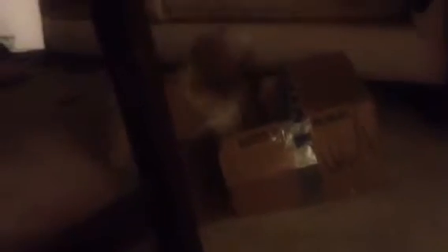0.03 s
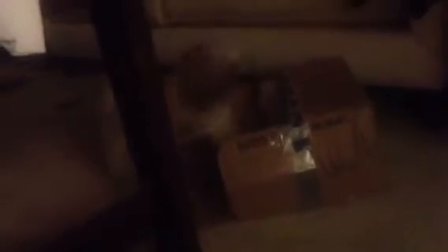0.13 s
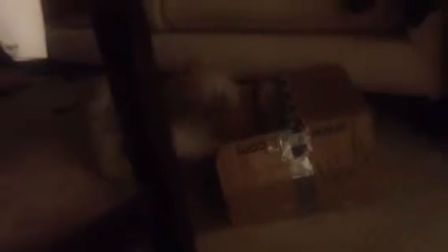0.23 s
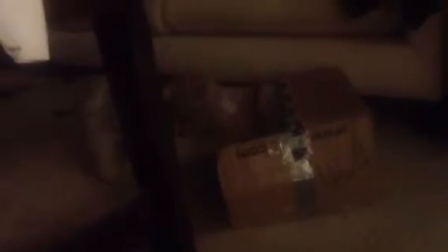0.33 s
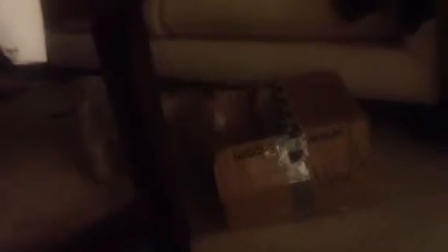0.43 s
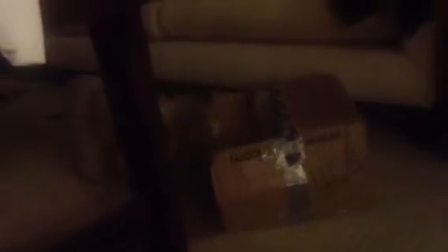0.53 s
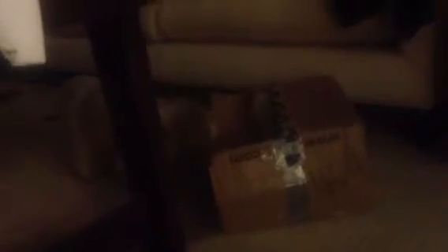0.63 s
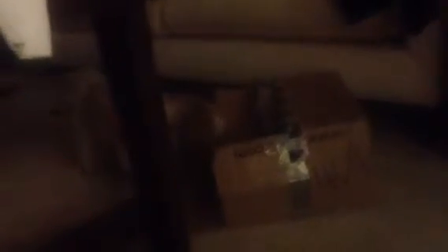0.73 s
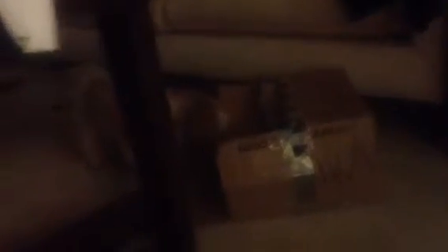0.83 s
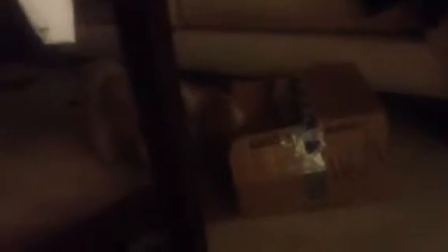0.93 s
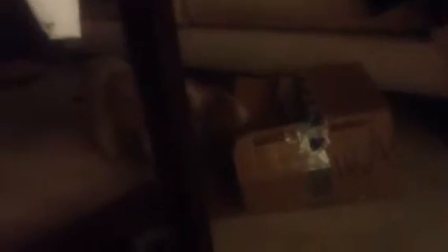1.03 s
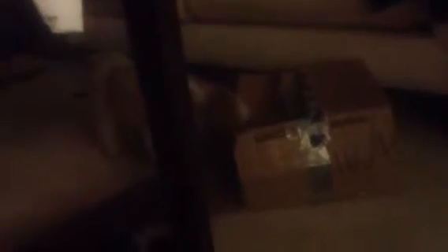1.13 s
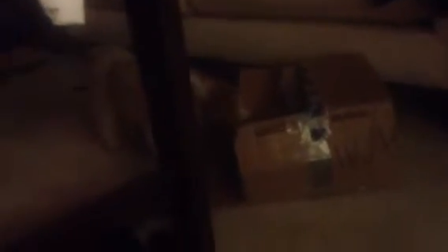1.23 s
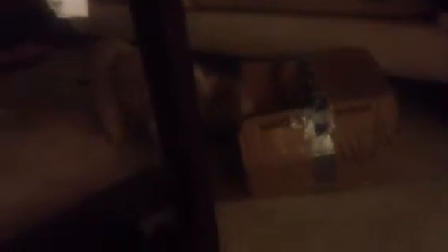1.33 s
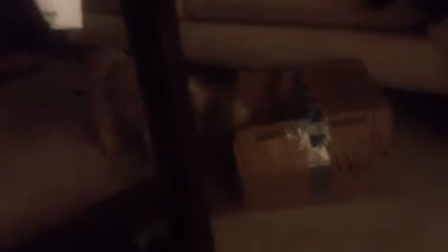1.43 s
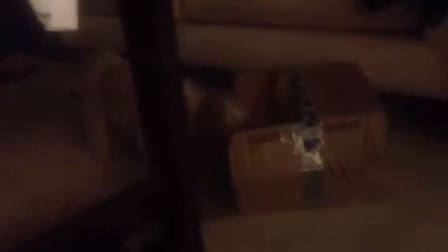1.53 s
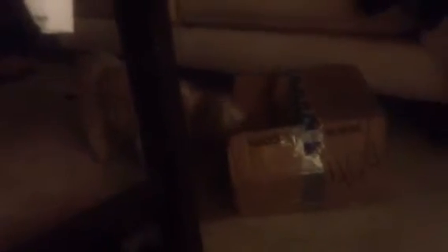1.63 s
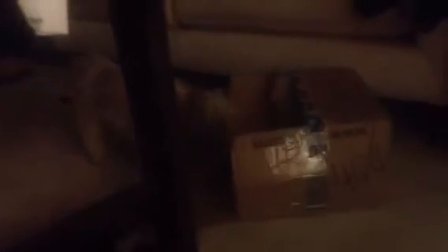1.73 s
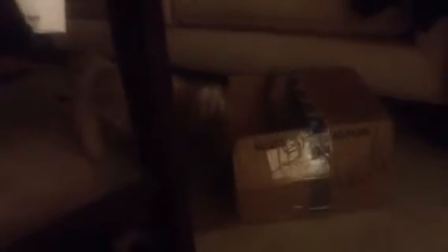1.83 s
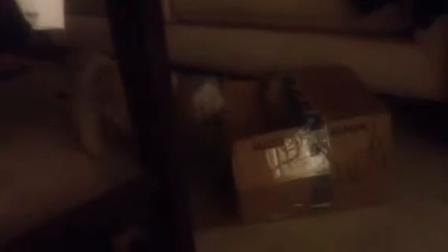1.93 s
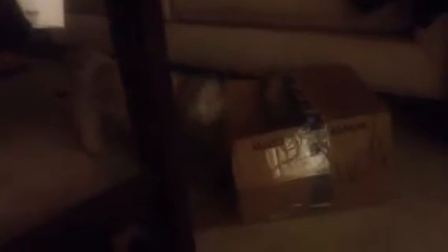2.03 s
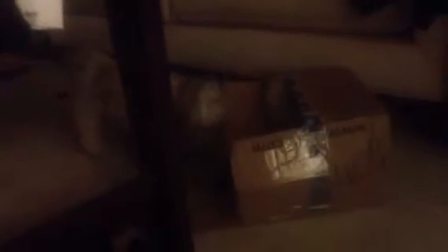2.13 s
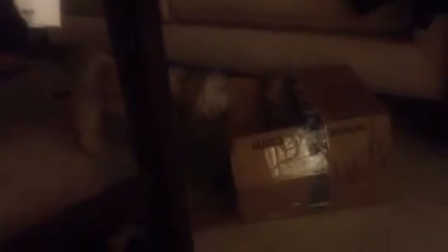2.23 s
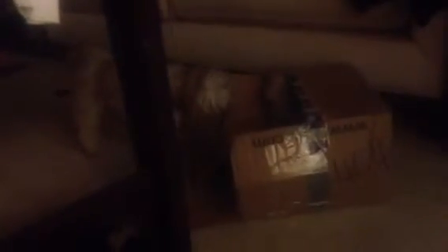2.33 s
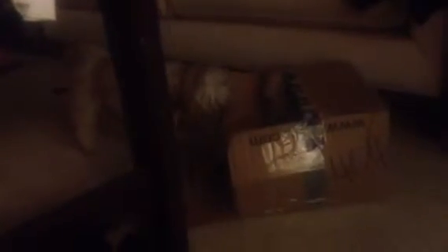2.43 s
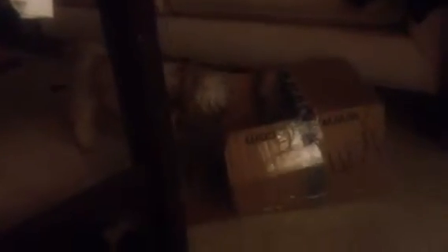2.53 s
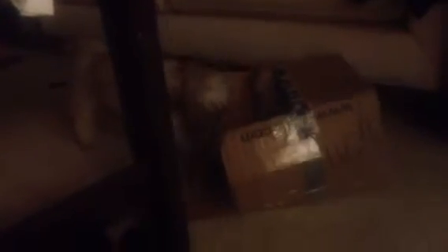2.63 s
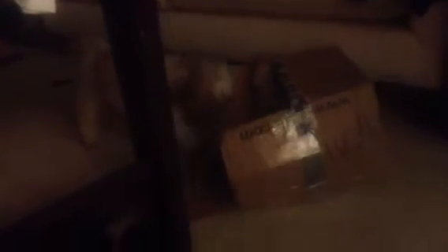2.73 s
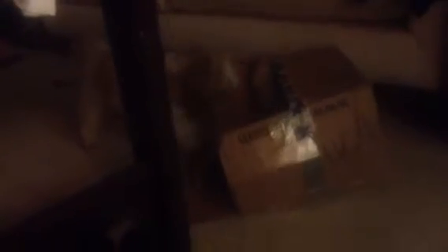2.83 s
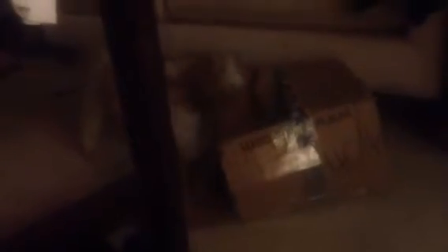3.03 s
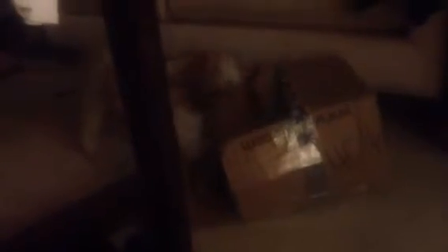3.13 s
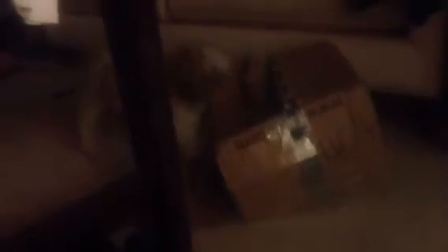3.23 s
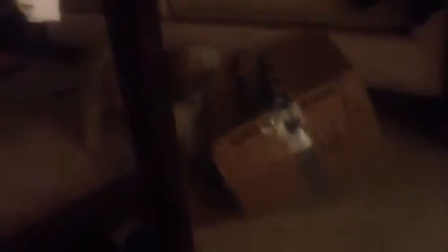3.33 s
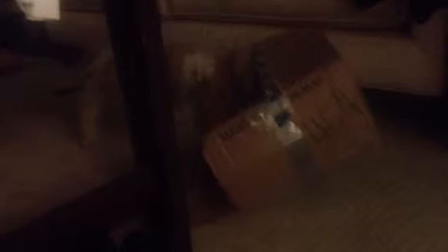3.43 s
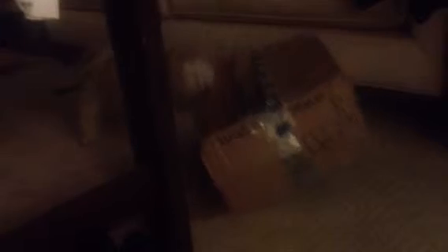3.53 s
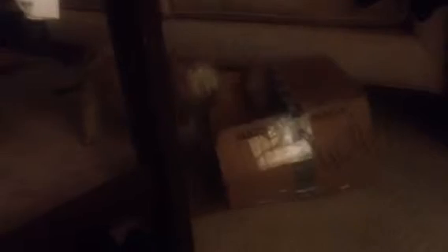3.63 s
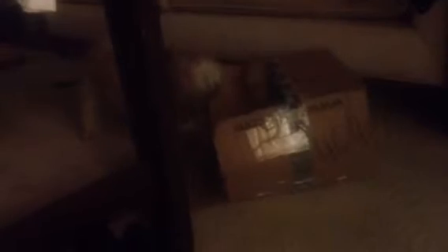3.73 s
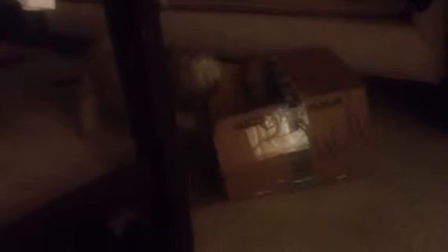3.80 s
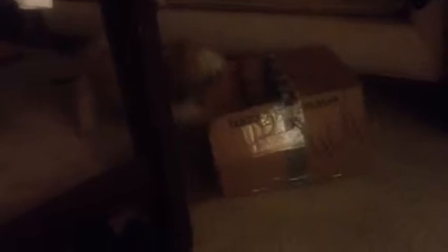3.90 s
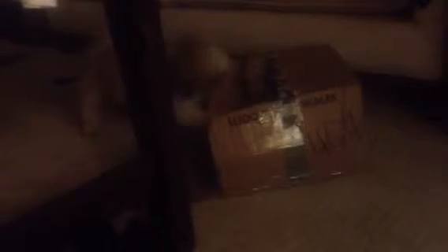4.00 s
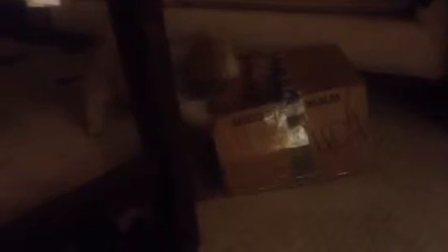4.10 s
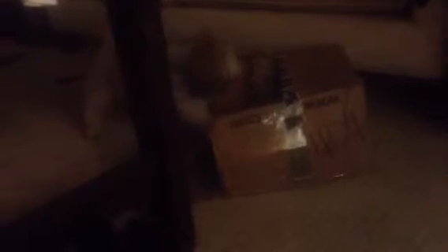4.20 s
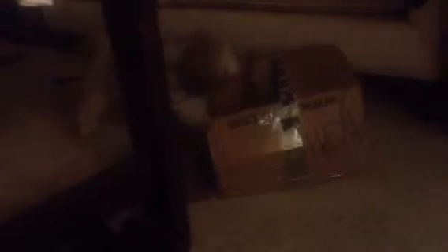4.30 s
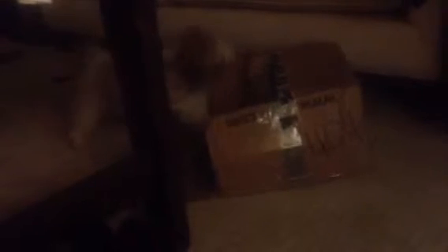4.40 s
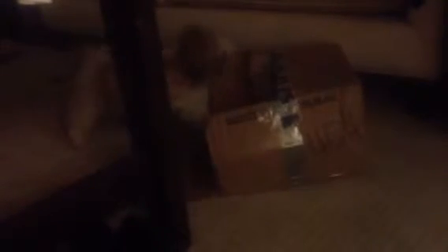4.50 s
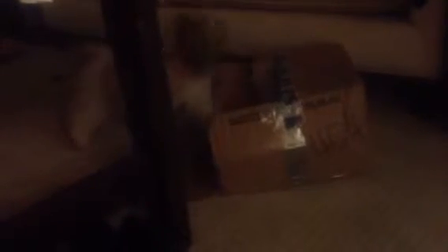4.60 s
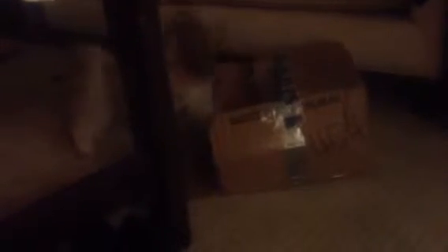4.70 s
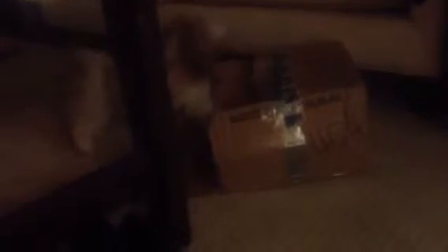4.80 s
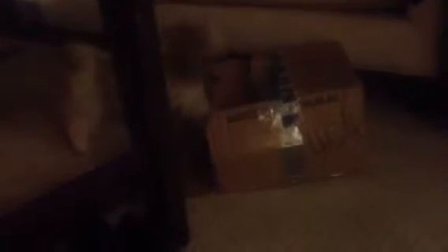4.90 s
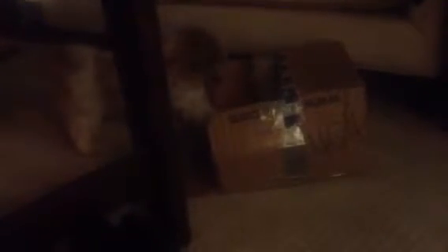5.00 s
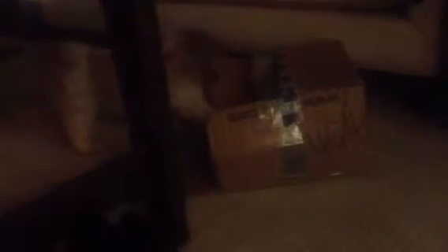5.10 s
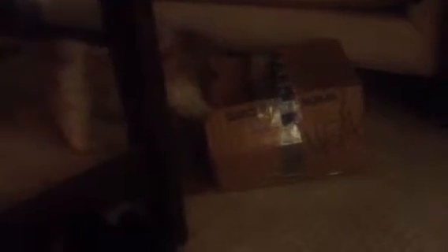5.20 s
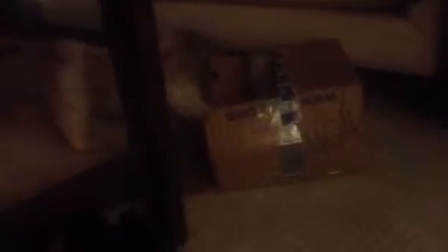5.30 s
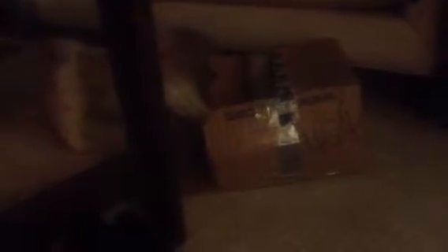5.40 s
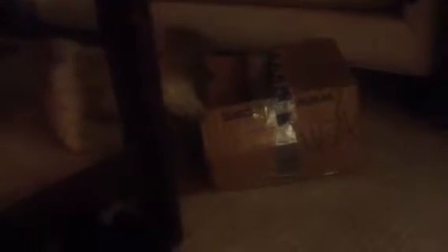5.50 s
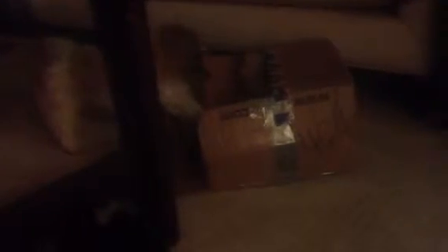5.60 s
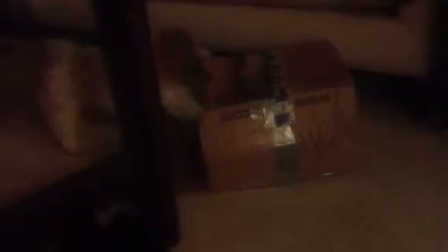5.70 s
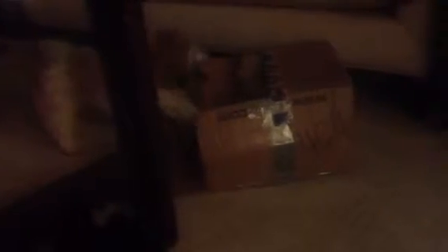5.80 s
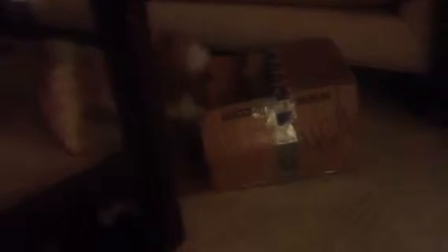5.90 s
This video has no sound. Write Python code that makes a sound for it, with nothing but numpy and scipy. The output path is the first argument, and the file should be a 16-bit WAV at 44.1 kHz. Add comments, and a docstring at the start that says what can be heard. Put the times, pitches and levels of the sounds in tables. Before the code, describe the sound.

A dog rummages in a cardboard box in a quiet room, with irregular scraping, paper rustles, crackles and hollow thumps.

```python
"""A dog rummages with its head in a taped cardboard box on a carpet, in a quiet furnished room.
Fur, paws and paper rub along the board, catching and slipping, so it rasps, hisses and drums.
Creases and tape snap. The box is knocked, tipped and dropped back: walls thump and flaps clap.
The dog sniffs faintly twice at the end. A small mono camera listens from a few steps away."""
import sys
import numpy as np
from scipy import signal
from scipy.fft import rfft, irfft, next_fast_len
from scipy.io import wavfile

SR = 44100
rng = np.random.default_rng(int(sys.argv[2]) if len(sys.argv) > 2 else 0)


def output_pcm(signal):
    """Save a mono or channel-first signal as 16-bit PCM at the path in sys.argv[1].

    Samples are clipped to [-1, 1] before scaling.
    """
    pcm = np.clip(np.atleast_2d(signal).T, -1, 1) * 32767
    wavfile.write(sys.argv[1], SR, np.round(pcm).astype(np.int16))


N = 262395


def amp(db):
    """Turn decibels into a number to multiply by."""
    return 10 ** (np.asarray(db) / 20)


def unit(x, seconds=None):
    """Scale x to an average strength (rms) of 1, over all of it or its first seconds."""
    head = x if seconds is None else x[:round(seconds * SR)]
    return x / np.sqrt(np.mean(head ** 2) + 1e-20)


def along(points, hz):
    """Read between (frequency, value) points, with octaves evenly spaced."""
    freqs, values = np.transpose(points)
    return np.interp(np.log(hz + 1), np.log(freqs), values)


def colour(x, points):
    """Shape the tone of x to follow the (f/Hz, level/dB) points."""
    size = 2 * next_fast_len(len(x) // 2 + 1024)
    gain = amp(along(points, np.fft.rfftfreq(size, 1 / SR)))
    cepstrum = irfft(np.log(gain))
    cepstrum[1:size // 2] *= 2  # folded so the filter rings after a sound, never before
    cepstrum[size // 2 + 1:] = 0
    return irfft(rfft(x, size) * np.exp(rfft(cepstrum)))[:len(x)]


def resonate(x, peaks):
    """Add ringing to x at each (f/Hz, width/Hz, level/dB) peak."""
    return x + sum(amp(db) * signal.lfilter(*signal.iirpeak(hz, hz / width, SR), x)
                   for hz, width, db in peaks)


def wobble(rate):
    """A curve that heads for a new random value rate times a second."""
    knots = rng.standard_normal(int(N * rate / SR) + 2)
    return np.interp(np.arange(N) * rate / SR, np.arange(len(knots)), knots)


def fade(t, t60):
    """Die away, dropping 60 dB in the fade time t60."""
    return np.exp(-np.log(1000) * t / t60)


def add(track, s, sound):
    """Mix a sound into the track at s seconds."""
    part = track[round(s * SR):][:len(sound)]
    part += sound[:len(part)]


# tone of the background: f/Hz, level/dB
AIR_TONE = [(25, -45), (60, -24.5), (100, -26), (130, -3.5), (165, -12), (215, 5.5), (300, -15.5),
            (400, -8), (520, -14), (1450, -15), (2400, -21.5), (7000, -23.5), (10000, -28.5),
            (15000, -23.5)]
def air():
    """The still room murmurs and the microphone hisses."""
    return amp(-67.0) * unit(colour(rng.standard_normal(N), AIR_TONE))


# how long the room's echo lasts: f/Hz, fade time/s
ECHO_TIMES = [(150, 0.098), (800, 0.32), (4500, 0.24), (12000, 0.21)]
def room(x, wet_db):
    """The direct sound plus a short wash of echo at wet_db, new for each place it comes from."""
    hz, t, spectrum = signal.stft(rng.standard_normal(SR // 5), SR, nperseg=256)
    tail = signal.istft(spectrum * fade(t, along(ECHO_TIMES, hz)[:, None]), SR, nperseg=256)[1]
    tail *= 1 - fade(np.arange(len(tail)) / SR, 0.017)  # the first walls answer after a few ms
    response = amp(wet_db) * tail / np.linalg.norm(tail)
    response[0] = 1
    return signal.fftconvolve(x, response / np.linalg.norm(response))[:len(x)]


def moving_room(x, wet_db, count=24):
    """The dog shifts about, so each echo blends into a new one."""
    place = np.arange(N) / N * (count - 1)
    track = np.zeros(N)
    for k in range(count):
        start = max(0, (k - 1) * N // (count - 1))
        share = np.clip(1 - abs(place - k), 0, 1)
        piece = (x * np.sqrt(share))[start:start + 3 * N // (count - 1)]
        add(track, start / SR, room(piece, wet_db))
    return track


def grainy_noise(rate, spread_db, smooth_db):
    """Tiny uneven clicks, about rate a second, over smooth noise."""
    sizes = amp(spread_db * rng.uniform(0, 1.85, N)) * rng.choice([-1, 1], N)
    clicks = unit(sizes * (rng.random(N) < rate / SR))
    return unit(clicks + amp(smooth_db) * rng.standard_normal(N))


def push(start, length, swell, sag_db_per_s=28, release_s=0.097):
    """The force of one stroke or sniff: it swells, eases while held, and is let go."""
    t = np.maximum(np.arange(N) / SR - start, 0)
    sag = amp(-sag_db_per_s * np.maximum(t - swell, 0))
    release = fade(np.maximum(t - length, 0), release_s)
    return np.minimum(t / swell, 1) * sag * release


# two short breaths: t/s, length/s, swell/s, level/dB
SNIFFS = [(5.542, 0.13, 0.014, -66.5), (5.801, 0.17, 0.02, -64.5)]
# tone of a sniff: f/Hz, level/dB
SNIFF_TONE = [(400, -30), (1300, -2), (2800, -2), (4000, -11), (9000, -30)]
# where a sniff rings: f/Hz, width/Hz, level/dB
SNIFF_PEAKS = [(1420, 450, 11), (2730, 200, 10)]
def sniffs():
    """Air rushes through the dog's nose as it sniffs faintly twice at the end."""
    force = sum(amp(db) * push(start, length, swell) for start, length, swell, db in SNIFFS)
    airflow = grainy_noise(rate=1600, spread_db=-1, smooth_db=4)
    breath = unit(resonate(colour(airflow, SNIFF_TONE), SNIFF_PEAKS))
    return room(force * amp(0.79 * wobble(40)) * breath, wet_db=-4)


# creases and tape giving way: t/s, crack level/dB, crack f/Hz, crackle level/dB
CREASE_SNAPS = [(0.206, -57, 4400, -58), (0.2508, -31, 3130, -39), (0.268, -33, 3670, -49),
                (1.6966, -64, 1970, -71), (1.7301, -54, 2080, -63), (1.766, -47.5, 3300, -66),
                (1.947, -67, 2850, -53), (2.212, -57, 1510, -48.5), (2.3434, -58.5, 4250, -57),
                (2.404, -60, 4800, -44.5), (2.414, -34.5, 4670, -40), (2.5042, -38.5, 2660, -33.5),
                (2.514, -39, 1320, -50), (2.7829, -42.5, 2850, -38), (2.8088, -31, 6200, -37),
                (2.8101, -25, 3920, -31.5), (2.9298, -49, 1900, -42.5), (3.0401, -45.5, 3850, -44),
                (3.1968, -36, 2900, -39), (3.218, -46, 3360, -37), (3.301, -53, 2530, -34.5),
                (3.389, -53, 3000, -48), (3.6796, -40.5, 3430, -55), (3.9662, -41, 2100, -33),
                (4.203, -50, 3400, -58), (4.2402, -67, 3250, -36.5), (4.28, -47, 1990, -40),
                (4.47, -40.5, 2900, -33.5), (4.5782, -27, 3270, -39), (4.592, -45, 2210, -39),
                (5.2022, -69, 3700, -58), (5.223, -60, 4170, -62)]
# tone of a crack: multiple of its pitch, level/dB
CRACK_TONE = [(.02, -52), (.08, -31), (.25, -3.5), (.6, -3), (.95, 4), (1.15, -2.5), (1.6, -2.5), (3, -10),
              (6, -37)]
# the bright zing a crack sets off: f/Hz, width/Hz, level/dB
CRACK_ZING = [(4400, 420, -9.5)]
# tone of paper and tape, crackling or rubbed: f/Hz, level/dB
PAPER_TONE = [(1500, -42), (4000, -16), (6000, -1.5), (8500, 3.5), (11500, 1), (13500, -2), (15500, -12.5)]
def snaps():
    """A crease breaks in an instant; the fibres crackle on briefly and the room answers."""
    track, t = np.zeros(N), np.arange(SR // 4) / SR
    for s, crack_db, crack_hz, crackle_db in CREASE_SNAPS:
        breaking = rng.standard_normal(len(t)) * (fade(t, 0.0072) + amp(-13.5) * fade(t, 0.037))
        tearing = rng.standard_normal(len(t)) * (fade(t, 0.014) + amp(-20) * fade(t, 0.031))
        tone = [(multiple * crack_hz, db) for multiple, db in CRACK_TONE]
        crack = amp(crack_db) * unit(resonate(colour(breaking, tone), CRACK_ZING), 0.0037)
        crackle = amp(crackle_db - 1.5) * unit(colour(tearing, PAPER_TONE), 0.0036)
        add(track, s, room(crack + crackle, wet_db=-1.0))
    return track


# the box's own notes: f/Hz, level/dB, fade time/s
BOX_NOTES = [(132, -7.5, 0.27), (176, -10, 0.17), (204.9, -1, .19), (234.3, -4.5, 0.19), (270.9, -4, 0.21),
             (346, -7.5, 0.11), (413.8, -4.5, 0.16), (480, -4, 0.2), (568.5, 0.5, 0.21), (658.6, 7, 0.11),
             (717, -5.5, 0.14), (776, 0, 0.22), (900, 2.5, 0.16), (1037, 0, 0.083), (1180, -15, 0.063),
             (1313, -6.5, 0.16)]
def box_ring(t, centre_hz, octaves, rise, scatter_db=0.0):
    """A blow mainly wakes the box's notes near its own pitch."""
    hz, db, t60 = np.transpose(BOX_NOTES)
    nearness = np.exp(-.5 * (np.log2(hz / centre_hz) / octaves) ** 2)
    gain = amp(db + scatter_db * rng.standard_normal(len(hz))) * nearness
    phase = rng.uniform(0, 2 * np.pi, (len(hz), 1))
    notes = np.sin(2 * np.pi * hz[:, None] * t + phase) * fade(t, t60[:, None])
    return unit(gain @ notes * (1 - fade(t, rise)), 0.027)


# blows on the box: t/s, thump level/dB, thump f/Hz, clap level/dB, clap f/Hz, buckle-to-ring ratio
BLOWS = [(.25, -52, 350, -50, 900, 0.78), (1.07, -62.5, 280, -66.5, 930, 0.34),
         (1.184, -76, 240, -65, 1080, 0.34), (1.54, -67, 270, -63.5, 935, 0.3),
         (1.727, -56.5, 270, -67, 915, 0.54), (1.766, -61, 262, -60, 950, .4),
         (1.989, -57, 243, -76, 700, 0.14), (2.211, -45, 240, -50, 684, 0.95),
         (2.414, -35.5, 280, -44.5, 900, 1.1), (2.504, -67, 310, -37, 860, .3),
         (2.516, -64, 300, -40.5, 875, 0.27), (2.782, -40.5, 273, -41.5, 666, 0.48),
         (2.808, -31.5, 213, -34, 570, .3), (2.819, -39, 210, -35, 630, 0.26),
         (2.901, -47.5, 216, -66, 800, 0.43), (3.039, -50.5, 267, -62, 919, .15),
         (3.195, -46.5, 234, -52, 826, 0.26), (3.522, -50, 168, -73, 904, 0.17),
         (3.687, -34.5, 225, -44.5, 785, 0.21), (3.967, -44, 263, -37.5, 834, 0.27),
         (3.978, -47.5, 230, -41, 1150, 0.2), (4.219, -48, 257, -63, 774, 0.53),
         (4.28, -51.5, 222, -46.5, 950, .3), (4.432, -55, 222, -46, 788, .3),
         (4.47, -35, 187, -47, 885, 0.26), (4.577, -37.5, 283, -34.5, 1030, 0.19),
         (4.598, -29, 254, -39.5, 704, 0.25), (4.609, -35, 220, -35, 444, 1.2),
         (4.996, -57.5, 237, -87, 953, 0.27)]
def knocks():
    """A blow buckles a wall and leaves it ringing, while the loose flaps clap and chatter."""
    track, t = np.zeros(N), np.arange(SR // 4) / SR
    for s, thump_db, thump_hz, clap_db, clap_hz, buckling in BLOWS:
        buckle = unit(np.sin(2 * np.pi * thump_hz * t) * t ** 2 * fade(t, 0.016), 0.039)
        thump = unit(box_ring(t, thump_hz, octaves=0.51, rise=0.0095) + buckling * buckle, 0.025)
        flap_tone = [(clap_hz / 4, -36), (clap_hz / 2, -20), (clap_hz, 0),
                     (clap_hz * 2, -10), (clap_hz * 6, -28), (20000, -50)]
        chatter = unit(colour(rng.standard_normal(len(t)) * fade(t, 0.22), flap_tone), 0.022)
        clap = unit(box_ring(t, clap_hz, octaves=0.41, rise=0.0078) + 0.53 * chatter, 0.023)
        add(track, s, amp(thump_db) * thump + amp(clap_db) * clap)
    bass_cut = [(35, -32), (70, -18.0), (120, -1.0)]  # a small box sends out little deep bass
    return room(colour(track, bass_cut), wet_db=-9.5)


# fur brushing the box as the dog shifts: t/s, level/dB
FUR_BRUSHING = [(0, -58), (.18, -75), (.42, -60.5), (.55, -77.5), (.9, -79), (1.35, -72.5), (1.7, -66.5),
                (2.1, -68), (2.38, -68.5), (2.7, -58), (3.6, -56.5), (3.87, -66.5), (4.3, -53.5),
                (4.85, -68), (5.35, -76.5), (5.5, -70), (5.95, -75)]
# muzzle and paws sliding along the box: t/s, length/s, swell/s, rasp level/dB, hiss level/dB
DOG_STROKES = [(0, 0.054, 0.005, -50.5, -53.5), (0.197, 0.065, 0.012, -47.5, -50.5),
               (0.261, 0.045, .014, -36.5, -41), (0.306, 0.059, 0.027, -41, -42.5),
               (1.059, 0.026, .015, -70, -68), (1.165, 0.042, .015, -71, -63),
               (1.516, .05, 0.028, -63.5, -70), (1.749, 0.099, 0.031, -56.5, -55),
               (1.838, 0.27, 0.037, -64, -56), (2.504, 0.014, 0.0053, -40, -62),
               (2.555, 0.056, 0.037, -46, -47.5), (2.618, 0.093, 0.012, -58, -56),
               (2.799, 0.039, .008, -51, -38.5), (2.927, 0.15, 0.039, -53.5, -54),
               (3.029, 0.033, 0.013, -46.5, -49.5), (3.14, 0.073, .012, -56, -52),
               (3.199, 0.12, .02, -49.5, -44), (3.317, 0.077, .02, -59, -59),
               (3.425, 0.11, 0.12, -41.5, -39.5), (3.538, 0.091, 0.014, -53, -65),
               (3.67, 0.056, 0.011, -43, -45), (3.955, 0.029, 0.017, -37, -51),
               (3.986, 0.11, 0.0073, -46.5, -47.5), (4.137, 0.18, .05, -54, -62),
               (4.269, 0.038, 0.011, -44.5, -56), (4.357, 0.13, 0.13, -44, -47),
               (4.57, 0.034, 0.0065, -36.5, -37), (4.646, 0.12, 0.015, -55.5, -60),
               (5.863, 0.084, 0.053, -61.5, -62.5)]
def contact_levels():
    """How hard fur, strokes and blows drive the drumming, rasp and hiss over time, in dB."""
    t = np.arange(N) / SR
    fur = amp(np.interp(t, *np.transpose(FUR_BRUSHING)))
    rasp, hiss = fur ** 2, (amp(-1.5) * fur) ** 2  # squared, because noises add by power
    for start, length, swell, rasp_db, hiss_db in DOG_STROKES:
        force = push(start, length, swell)
        rasp += (amp(rasp_db) * force) ** 2
        hiss += (amp(hiss_db) * force) ** 2
    drum = amp(-32) ** 2 * rasp ** 0.51  # gains about half a dB for each dB of rasp
    since = t[:SR // 2]
    for s, thump_db, *_ in BLOWS:  # the box shudders on after each blow
        shudder = amp(thump_db - 9) * fade(since, t60=0.51) * (1 - fade(since, .06))
        add(drum, s, shudder ** 2)
    return 10 * np.log10([drum, rasp, hiss])


# tones of the drumming walls, the dull scuff and the bright rasp: f/Hz, level/dB
DRUM_TONE = [(30, -42), (70, -33), (120, -9.5), (165, -12), (208, 4.5), (280, -4.5), (420, -9),
             (700, -36.5), (1500, -83)]
SCUFF_TONE = [(60, -41.5), (200, -29.5), (400, -5.5), (650, 1.5), (900, 2.5), (1200, -2), (2000, -8.5),
              (5000, -34)]
RASP_TONE = [(80, -50), (300, -25.5), (800, -4.5), (1300, 0), (1700, -2.5), (2300, -1.5), (4500, -4),
             (6500, -7.5), (10000, -16.5), (16000, -55)]
# stiff patches of board that sing when rubbed: f/Hz, width/Hz, level/dB
BOARD_PEAKS = [(673, 95, -3.5), (920, 29, -14), (1720, 220, -6), (2870, 330, -21)]
def rubbing():
    """Each stroke scuffs and rasps on the board, hisses on paper and tape, and makes the walls drum."""
    drum_db, rasp_db, hiss_db = contact_levels()
    judder_db = 0.62 * wobble(70) + 0.69 * wobble(260)  # the contact grips unevenly
    drum = amp(drum_db - 2) * unit(colour(rng.standard_normal(N), DRUM_TONE))
    grip = amp(judder_db) * grainy_noise(rate=1300, spread_db=3, smooth_db=0.5)  # fibres catch and slip
    scuff_db = 0.78 * rasp_db - 20.5  # a harder stroke gains more rasp than scuff
    scuff = amp(scuff_db) * unit(resonate(colour(grip, SCUFF_TONE), BOARD_PEAKS))
    rasp = amp(rasp_db - 5.0) * unit(resonate(colour(grip, RASP_TONE), BOARD_PEAKS))
    paper = grainy_noise(rate=2500, spread_db=8.0, smooth_db=-2.5)
    hiss = amp(hiss_db + judder_db - 2.0) * unit(colour(paper, PAPER_TONE))
    # as the contact shifts, the hiss turns now duller, now brighter
    lower = signal.sosfiltfilt(signal.butter(3, 9000, fs=SR, output="sos"), hiss)
    lean = amp(1.3 * wobble(6.7))
    shifting_hiss = lower * lean + (hiss - lower) / lean
    return drum + moving_room(scuff + rasp + shifting_hiss, wet_db=-2.5)


# the microphone's opening rings just under 5 kHz and cancels just above: f/Hz, level/dB
MIC_TONE = [(3600, -0.5), (4300, 2), (4800, 5.5), (5100, -6), (5700, -2), (6500, -1.5)]
def scene():
    """The box heard through the microphone's opening, over the quiet room, alike in both channels."""
    box = rubbing() + sniffs() + knocks() + snaps()
    mono = colour(box, MIC_TONE) + air()
    return np.array([mono, mono])


def record(dry, top_hz=15650):
    """The camera keeps nothing higher than top_hz."""
    size = next_fast_len(N + SR // 2)
    kept = np.fft.rfftfreq(size, 1 / SR) < top_hz
    return irfft(rfft(dry, size) * kept, size)[:, :N]


dry = scene()
out = record(dry)
output_pcm(out)
```